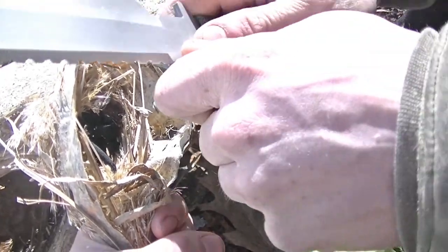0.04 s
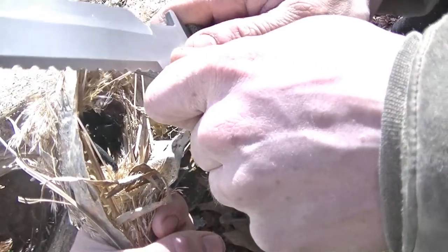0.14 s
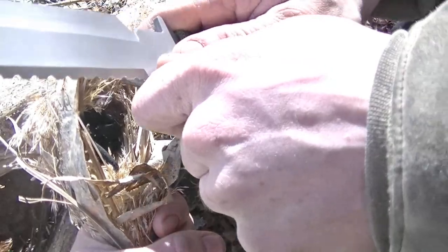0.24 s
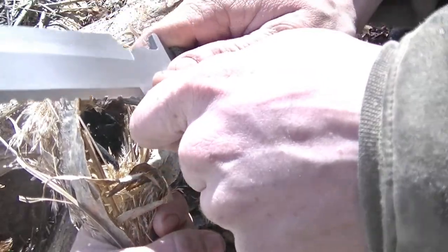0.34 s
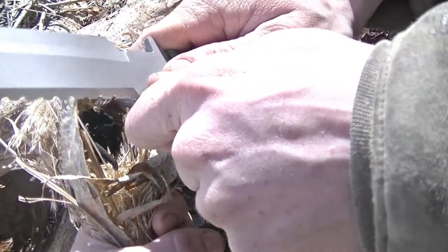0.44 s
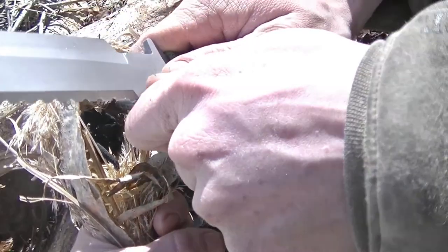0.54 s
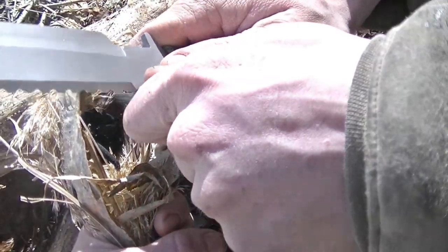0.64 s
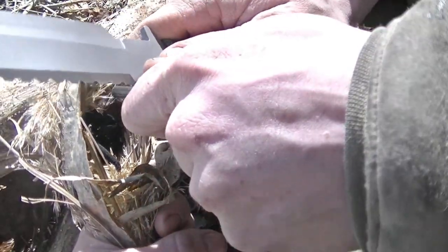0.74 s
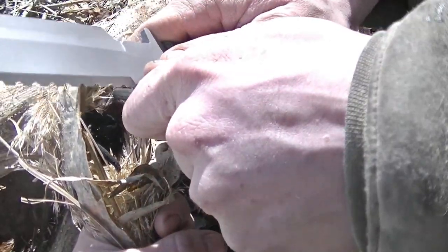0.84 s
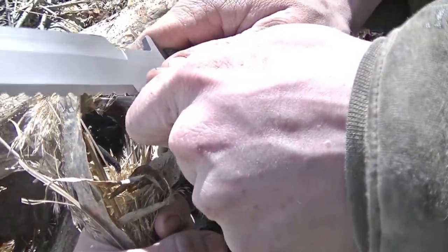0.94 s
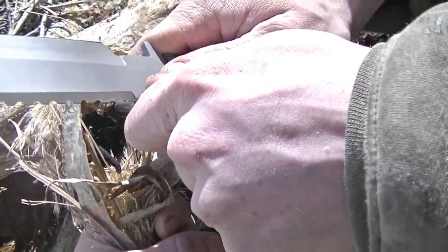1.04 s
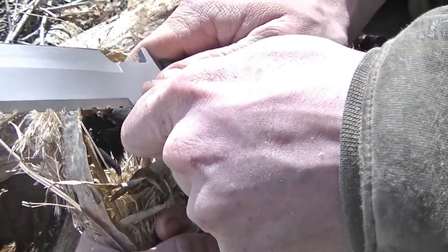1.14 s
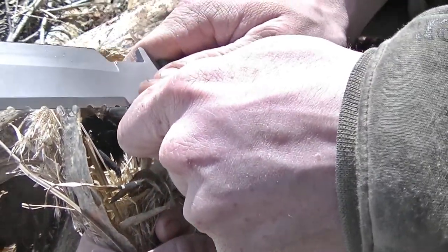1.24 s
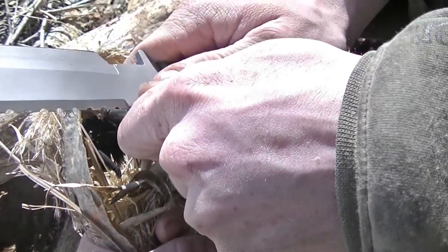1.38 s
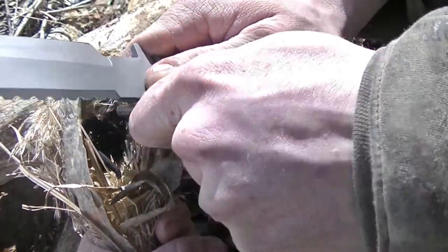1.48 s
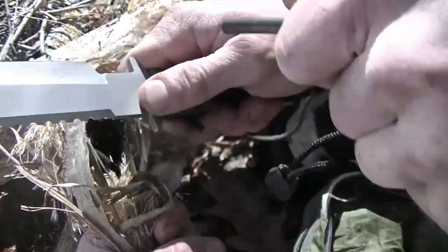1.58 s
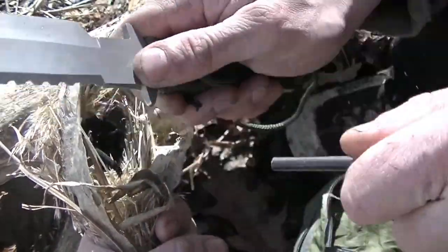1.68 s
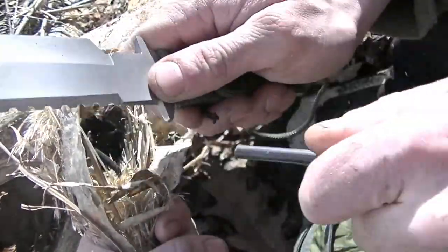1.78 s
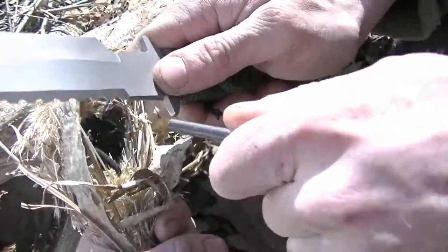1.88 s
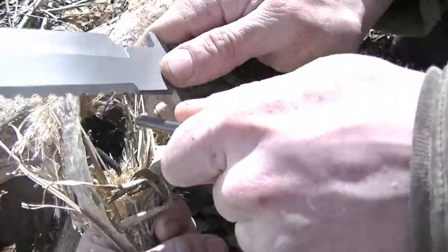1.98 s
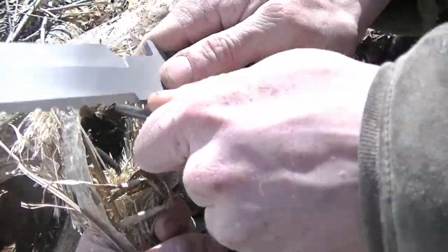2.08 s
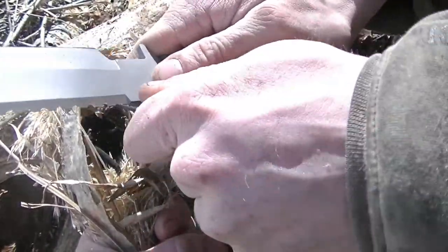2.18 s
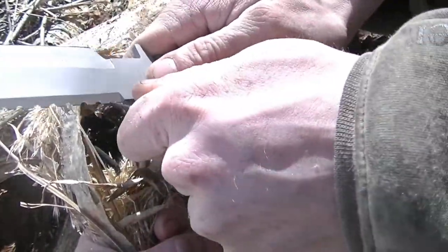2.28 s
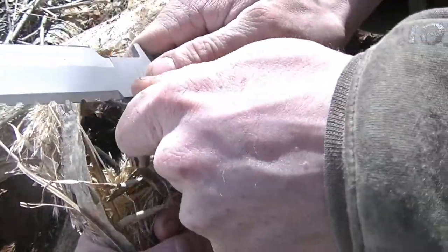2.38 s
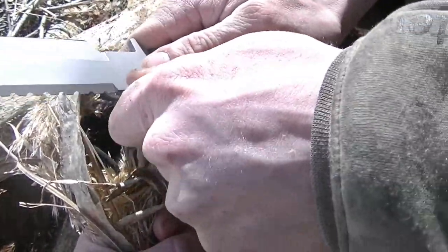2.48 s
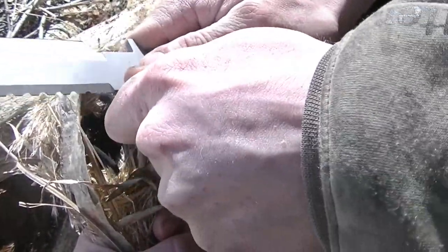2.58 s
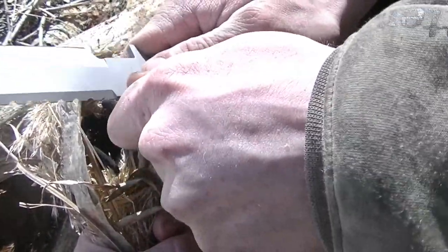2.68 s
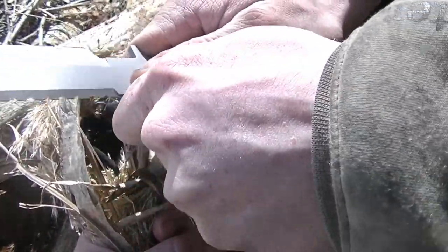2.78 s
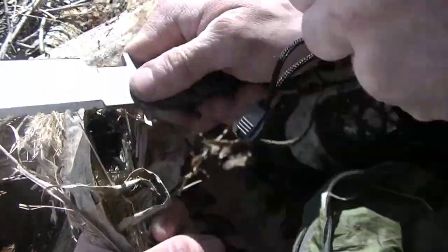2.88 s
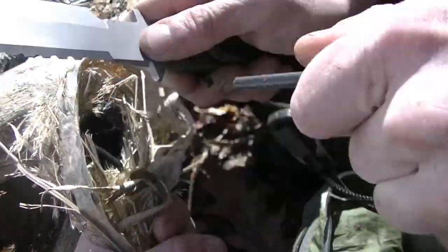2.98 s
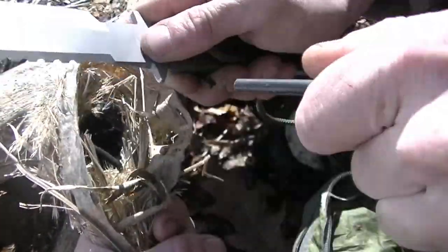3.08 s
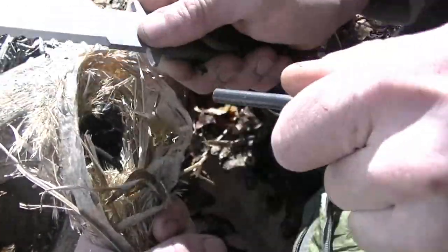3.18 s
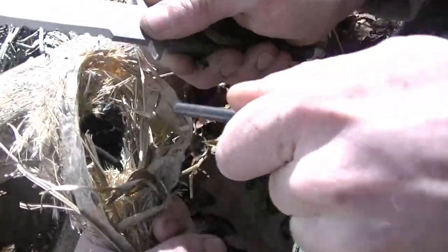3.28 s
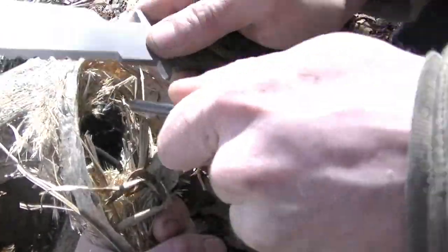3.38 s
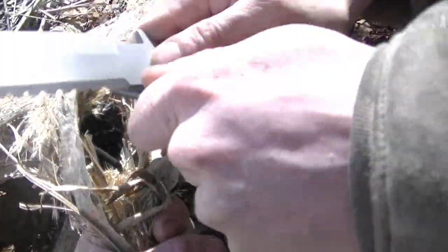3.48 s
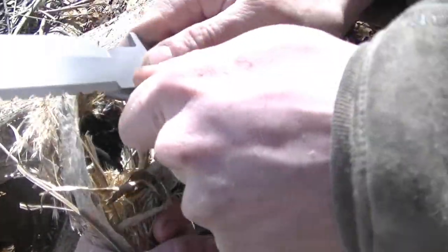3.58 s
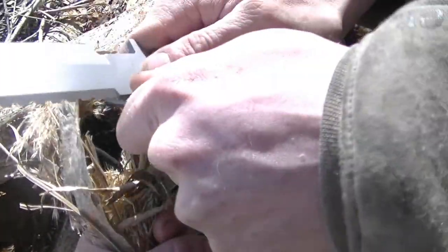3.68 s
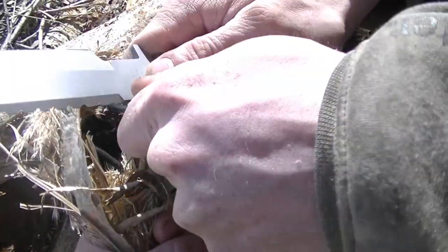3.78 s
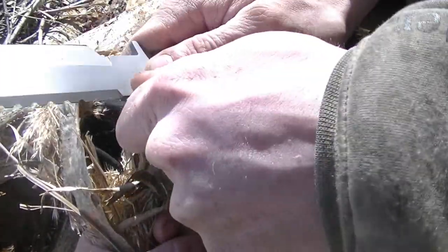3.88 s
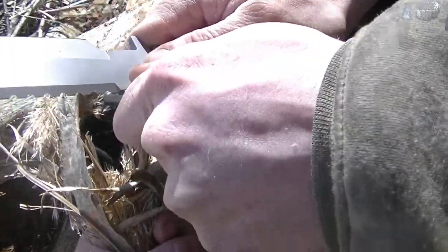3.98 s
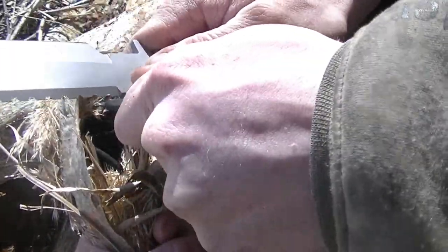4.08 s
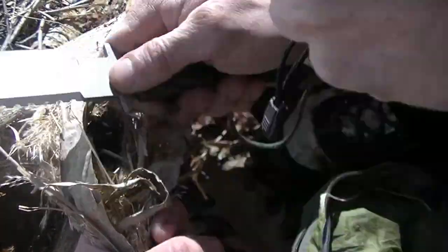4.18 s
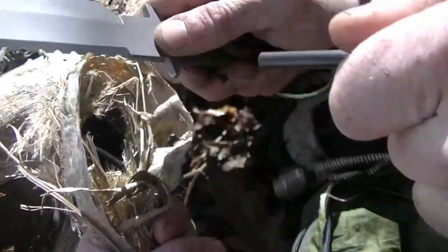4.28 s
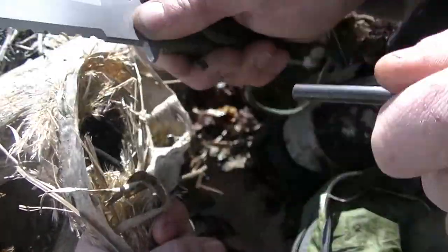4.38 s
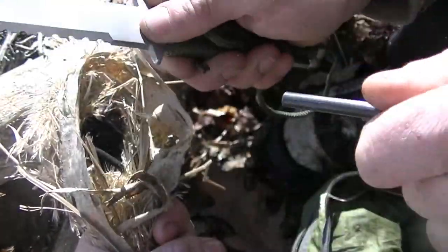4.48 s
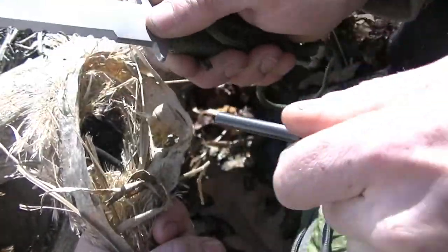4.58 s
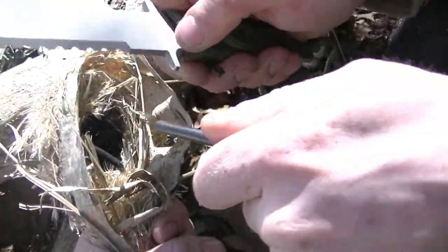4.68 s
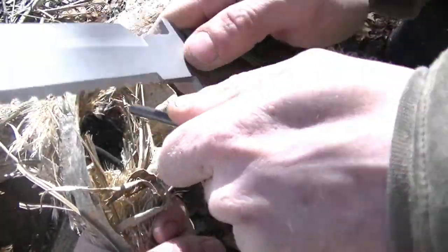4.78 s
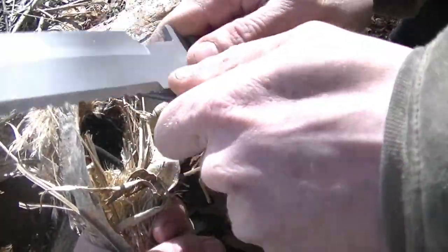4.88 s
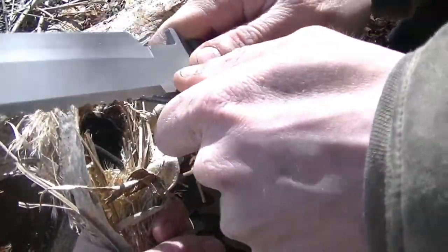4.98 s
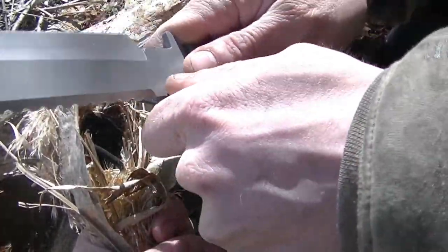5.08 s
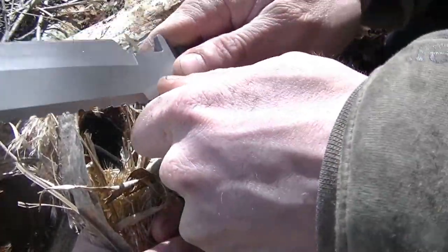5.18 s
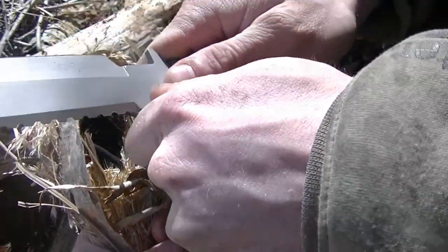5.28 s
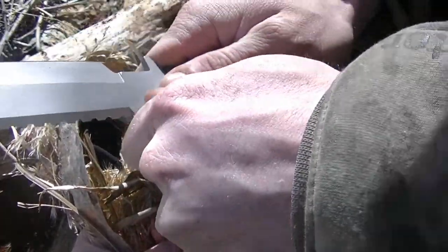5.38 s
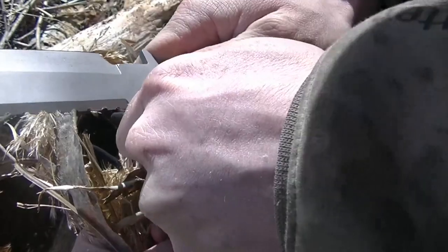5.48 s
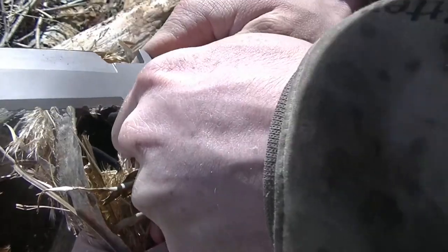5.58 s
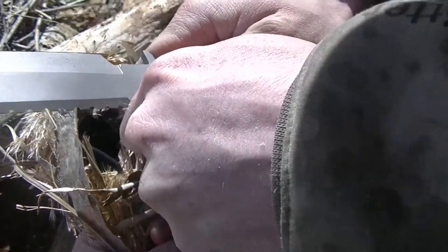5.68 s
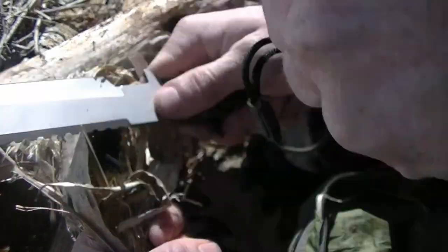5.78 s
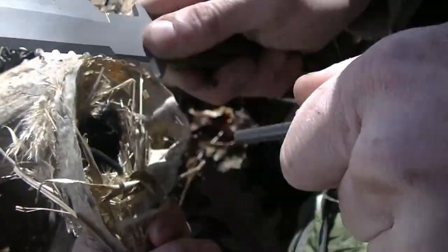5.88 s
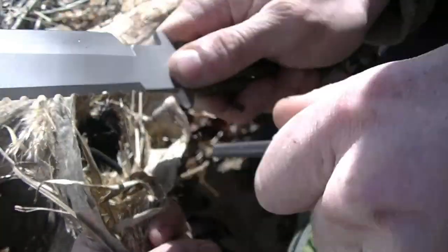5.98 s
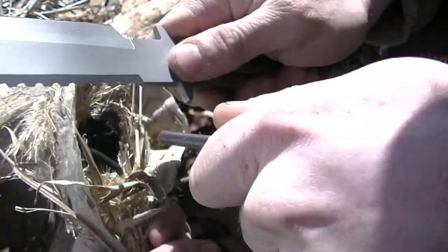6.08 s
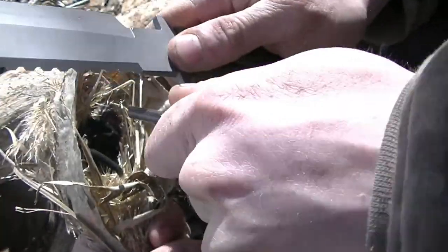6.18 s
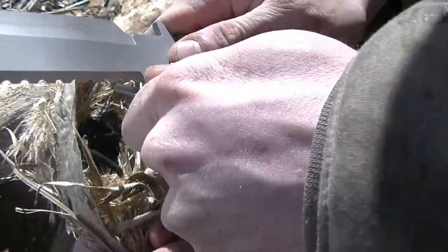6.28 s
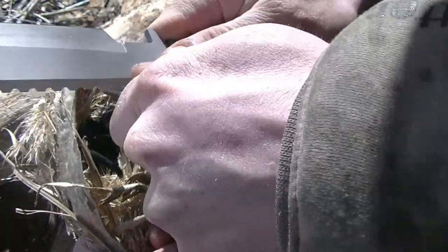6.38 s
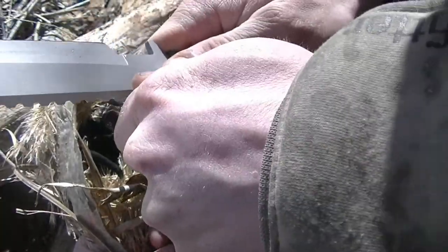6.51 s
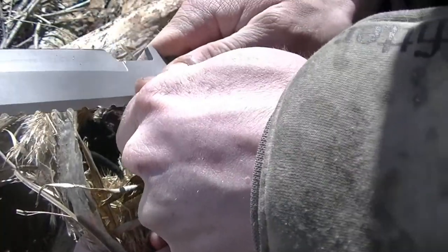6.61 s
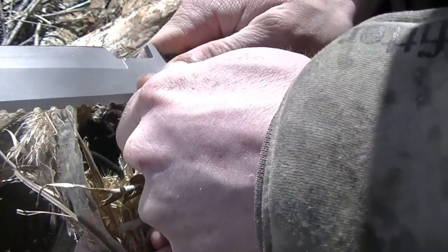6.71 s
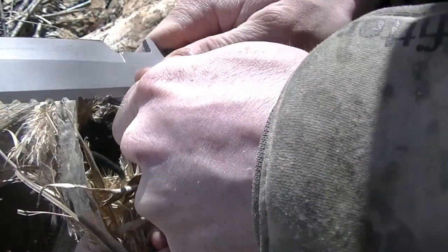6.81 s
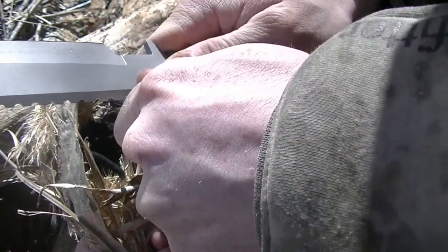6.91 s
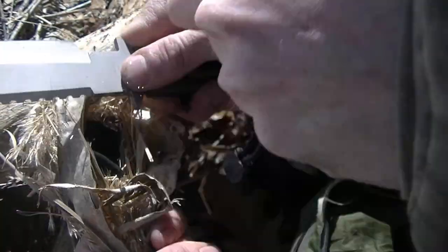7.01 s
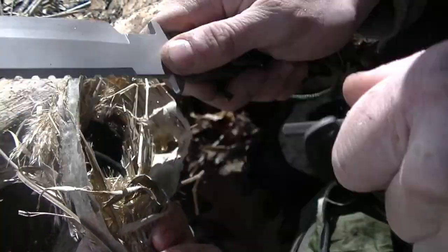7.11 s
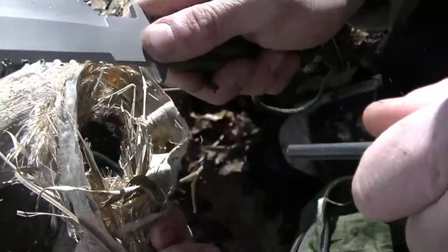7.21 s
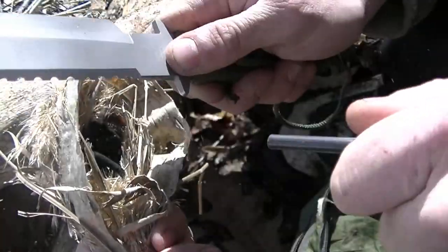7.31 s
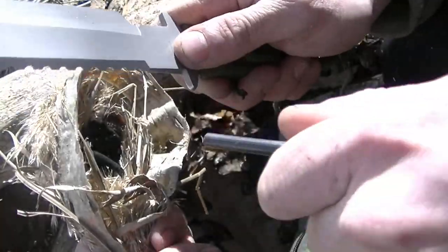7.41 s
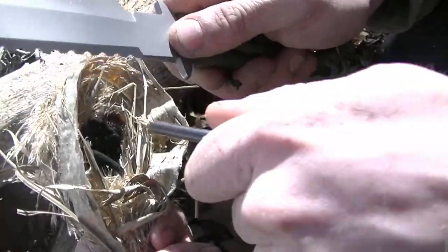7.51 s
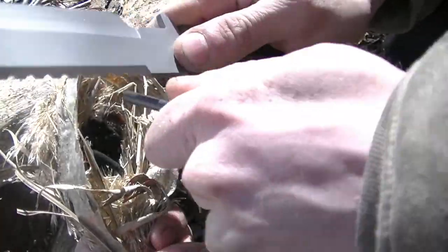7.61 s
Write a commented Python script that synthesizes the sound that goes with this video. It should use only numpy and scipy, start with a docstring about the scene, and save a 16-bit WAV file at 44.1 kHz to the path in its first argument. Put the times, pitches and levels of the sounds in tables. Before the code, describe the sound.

Quiet outdoor air and fine hiss open the scene; at about 0.6 s a small lens motor clicks on and chatters very faintly, about thirty steps a second, until 6.6 s and again from 7.2 s. At 1.5, 2.8, 4.15, 5.7 and 7.0 s a knife spine rips down a fire-starting rod: a gritty, bright metallic rasp of about a twentieth of a second, swelling quickly and stopping in a hard snap with a small dull thud. Sparks fizz out within a tenth of a second. Sharp pops follow at 2.98, 4.27 and 7.13 s, and a burning puff flares at 5.78 s. Steel ticks back on the rod clearly at 2.17 and 4.88 s, softly at 3.5 and 6.3 s, with tiny slides and faint tinder rustles. Close, dry stereo, with no audible echo; the end is quiet hiss.

```python
"""Outdoors, close up: a knife spine is driven down a ferro rod five times over a nest of dry tinder.
Each stroke swells as a grainy rasp through the modes of knife and rod, and snaps off with a knock and thud.
Sparks sizzle as fading coloured noise and pop as resonant bursts; between strokes the steel ticks back on
the rod, slides on it, and the tinder flares and rustles as noise puffs. A small stepping lens motor
chatters faintly over quiet air and hiss."""
import sys
import numpy as np
from scipy import signal
from scipy.fft import rfft, irfft
from scipy.io import wavfile
from scipy.ndimage import uniform_filter1d

SR = 44100
rng = np.random.default_rng(int(sys.argv[2]) if len(sys.argv) > 2 else 0)


def bounce(signal):
    """Save signal as a 16-bit WAV file at the path given by the first command-line argument."""
    frames = np.transpose(np.atleast_2d(signal))
    limited = np.clip(frames, -1, 1)
    pcm = np.round(limited * 32767).astype(np.int16)
    wavfile.write(sys.argv[1], SR, pcm)


N = 337365
TIME = np.arange(N) / SR
SIDES = np.array([[1], [-1]])   # left, right
BLADE_HZ, SQUEAL_HZ = 1606, 11100

# Strokes. Each row: snap time in seconds, length in seconds, rasp in dB, rod squeal against the rasp in dB
# (before SQUEAL_TRIM_DB), snap in dB, snap decay in seconds, sizzle in dB.
STROKE_ROWS = [(1.5168, 0.063, -19, -16, -17, .0008, -38.5), (2.8328, 0.055, -19.5, -30, -14.5, 0.001, -37),
               (4.157, .047, -18.5, -26, -16, 0.0015, -36.5),
               (5.7355, 0.061, -21.5, -32, -15.5, 0.00075, -35),
               (7.0085, .055, -19, -11, -16.5, .0014, -31)]
SWELL_POWER, CHATTER_DB, OVERRUN_S, RELEASE_S, SQUEAL_TRIM_DB = 2.45, 0.97, 0.0015, 0.0024, -12


def strokes():
    """Pressure builds along the rod: thin and bright at first, then the low modes bite, then it lets go."""
    out, t = np.zeros((2, N)), clock(0.3)
    for snap_s, length_s, rasp_db, squeal_db, _, _, sizzle_db in STROKE_ROWS:
        travel = np.clip(t / (length_s + OVERRUN_S), 0, 1)
        after_s = np.maximum(t - length_s - OVERRUN_S, 0)
        swell = np.sin(np.pi / 2 * travel) ** SWELL_POWER
        pressure = swell * np.exp(-after_s / RELEASE_S) * sputter(len(t), depth_db=CHATTER_DB)
        rasp, squeal = scrape(len(t), squeal_db, rough_db=5)
        low = cut(rasp, 7500, "low", order=1)
        thinned = rasp - 0.5 * (1 - travel) * low
        squeal = from_db(SQUEAL_TRIM_DB) * squeal * np.sin(np.pi * travel) ** 2
        # the squeal has its own swell, apart from the pressure
        add(out, snap_s - length_s, from_db(rasp_db) * (pressure * thinned + squeal))
        add(out, snap_s + OVERRUN_S, from_db(sizzle_db) * spark_shower(t))
    return out


# Sizzle spectrum. Each row: frequency in Hz, relative density in dB per Hz.
SIZZLE_SPECTRUM = [(200, -29.5), (1000, -16), (2000, -10.5), (3200, 0), (5200, -5.5), (6500, -2),
                   (7700, -5.5), (9400, -7), (11000, -17.5), (12500, -9), (14200, -14), (16000, -41)]
FADE_DB_PER_S, LIFE_S, ATTACK_S = 113, 0.13, 0.00075
CRACKLES_PER_S, CRACKLE_DB = 79, -12.5


def spark_shower(t):
    """Burning sparks hiss and crackle; the shower thins out, then the last ones go dark."""
    thinning = from_db(-FADE_DB_PER_S * t) / (1 + (t / LIFE_S) ** 8)
    embers = thinning * (1 - np.exp(-t / ATTACK_S)) * sputter(len(t), depth_db=1.5)
    sparks = grains(len(t), rough_db=3.5, spread=0.043) + from_db(CRACKLE_DB) * crackles(len(t))
    return embers * rms_one(colour(sparks, SIZZLE_SPECTRUM))


def crackles(size):
    """Lone sparks burst at random moments with uneven strength; unit power on average."""
    chance = CRACKLES_PER_S / SR
    return (rng.random(size) < chance) * rng.standard_normal(size) / np.sqrt(chance)


def sputter(size, depth_db):
    """A level that flares and fades every few milliseconds."""
    flicker = cut(rng.standard_normal(size), 103, "low")
    return rms_one(from_db(depth_db * rms_one(flicker)))


def scrape(size, squeal_db, rough_db):
    """The edge shaves the rod at unit level; friction makes the rod's top mode squeal."""
    force = grains(size, rough_db, spread=0.08)
    squeal = resonate(resonate(force, SQUEAL_HZ, 400), SQUEAL_HZ, 400)
    rasp = cut(steel(force, grit_db=-19.5), 970, "high")
    return rms_one(rasp), from_db(squeal_db) * rms_one(squeal)


# Knife and rod, damped by the hands. Each row: mode in Hz, width in Hz, gain in dB.
STEEL_MODES = [(1515, 55, -31), (2240, 180, -13), (2545, 134, 2.5), (2830, 88, 2), (2880, 30, 7),
               (3080, 210, 2.5), (3422, 176, 4), (3595, 97, 5), (4540, 210, 1.5), (5026, 120, 0.5),
               (5750, 100, -5.5), (6006, 87, 2.5), (6160, 210, -4), (6400, 160, -2), (7250, 740, -6),
               (8100, 300, -1.5), (8580, 400, 0), (9110, 160, -1), (9750, 540, -11), (11190, 200, -14.5)]
# Grit at the contact. Each row: frequency in Hz, relative density in dB per Hz.
GRIT_SPECTRUM = [(100, -61), (400, -21.5), (900, -10.5), (1500, 3), (2300, 2), (8000, -5), (11500, -4),
                 (13000, 3), (16000, -11)]


def steel(force, grit_db):
    """Knife and rod ring, and the contact itself radiates broadband grit."""
    return from_db(grit_db) * colour(force, GRIT_SPECTRUM) - body(force, STEEL_MODES)


# Thud in the hands. Each row: frequency in Hz, relative density in dB per Hz.
THUD_SPECTRUM = [(30, -10), (130, 1.5), (350, 0.5), (550, -1), (800, 7.5), (1400, -7.5), (2500, 4),
                 (6000, -43)]
THUD_RE_SNAP_DB = -24


def snaps():
    """A bright knock as the edge leaves the rod, and the hands take up a dull thud."""
    out = np.zeros((2, N))
    for snap_s, _, _, _, db, decay_s, _ in STROKE_ROWS:
        ring = knock(db, decay_s, hz=6200, boost_db=6, top_hz=16000, hum_db=-28.5, ping_db=-28)
        thud = colour(burst(0.0015, crack=1.3), THUD_SPECTRUM)
        add(out, snap_s, ring + at_level(thud, db + THUD_RE_SNAP_DB))
    return out


# Steel set back on the rod. Each row: time in seconds, level in dB, decay in seconds, strongest frequency
# in Hz, its boost in dB, rod ping against the level in dB.
SET_DOWN_ROWS = [(2.1676, -15, 0.00049, 7700, 19, -18), (3.499, -30.5, 0.00048, 2970, 11, -16),
                 (4.8845, -16.5, 0.0023, 7400, 9.5, -6), (6.3191, -27.5, 0.00041, 3230, 1, -41)]
FIRM_DB = -16   # reference for softer hits
FIRM_TOP_HZ, SOFTER_DB_PER_OCTAVE = 12800, 12.5
FIRM_HUM_DB, HUM_DB_PER_SOFTER_DB = -20, 0.5


def set_downs():
    """Steel lands on the rod without a thud: a hard landing is bright, a soft one duller with more hum."""
    out = np.zeros((2, N))
    for s, db, decay_s, hz, boost_db, ping_db in SET_DOWN_ROWS:
        softer_db = FIRM_DB - db
        top_hz = FIRM_TOP_HZ * np.exp2(-softer_db / SOFTER_DB_PER_OCTAVE)
        hum_db = FIRM_HUM_DB + HUM_DB_PER_SOFTER_DB * softer_db
        add(out, s, knock(db, decay_s, hz, boost_db, top_hz, hum_db, ping_db))
    return out


def knock(db, decay_s, hz, boost_db, top_hz, hum_db, ping_db):
    """The point of contact picks which modes ring most; blade and rod sing briefly."""
    t = clock(0.06)
    grip = np.exp(-t / 0.0042)   # the firm grip chokes the ring
    ring = steel(burst(decay_s, crack=0.53), grit_db=-16.5) * grip
    ring = cut(ring + (from_db(boost_db) - 1) * resonate(ring, hz, 1200), top_hz, "low")
    hum = from_db(db + hum_db) * np.sin(2 * np.pi * BLADE_HZ * t) * np.exp(-t / 0.0045)
    ping = from_db(db + ping_db) * np.sin(2 * np.pi * SQUEAL_HZ * t) * np.exp(-t / 0.0029)
    return at_level(ring, db) + hum + ping


# Pops of sparks, ticks of tinder, and at 0.658 s the lens motor's second step. Each row: time in seconds,
# level in dB (before panning), centre in Hz, nominal width in Hz (the filters are wider),
# pan as left minus right in dB.
CLICK_ROWS = [(.658, -44, 4650, 800, 4), (1.533, -38, 7000, 6000, -3), (1.634, -43, 5000, 5000, 1),
              (2.42, -53.5, 7400, 4000, 3), (2.609, -47, 8450, 900, 3), (2.9800, -20, 6400, 4050, -2.5),
              (3.130, -54.5, 6200, 1500, 8), (3.557, -51, 3000, 7000, 2), (4.2706, -18, 6340, 12100, -1.5),
              (4.734, -52, 3800, 2500, 0), (5.9054, -36, 3120, 1270, -2), (7.0784, -29.5, 3540, 5000, -1),
              (7.1328, -15.5, 4850, 1410, 2.5)]
CLICK_DECAY_S, CLICK_DOUBLING_DB, CLICK_TOP_HZ = 0.0013, 17, 16000   # decay at FIRM_DB, drop that doubles it


def pops_and_ticks():
    """Spark pops, tinder ticks and one motor step: resonant bursts, the loud ones over sooner."""
    out = np.zeros((2, N))
    for s, db, hz, width_hz, pan_db in CLICK_ROWS:
        decay_s = CLICK_DECAY_S * np.exp2((FIRM_DB - db) / CLICK_DOUBLING_DB)
        crack = burst(decay_s, crack=1.02)
        click = resonate(crack, hz, 1.5 * width_hz) + from_db(-9) * crack
        click = resonate(click, hz, 1.63 * width_hz)
        # bare crack fills in the lows and the very top
        fill = from_db(-25) * min(1, width_hz / 6000) * crack
        click = cut(cut(click, 1500, "high") + fill, CLICK_TOP_HZ, "low", order=4)
        add(out, s, at_level(click, db) * from_db(pan_db * SIDES / 2))
    return out


# Edge on the rod. Each row: centre in seconds, Gaussian sigma in seconds, peak level in dB,
# rod squeal against the rasp in dB (before SLIDE_SQUEAL_TRIM_DB).
SLIDE_ROWS = [(3.515, 0.027, -51, -14), (3.762, 0.012, -52, -36), (4.655, 0.017, -47, -3),
              (4.859, 0.011, -53.5, 9), (4.914, 0.014, -46, -5), (6.427, 0.0094, -43.5, 6)]
SLIDE_SQUEAL_TRIM_DB = -17


def slides():
    """The edge feels for its place on the rod with hardly any pressure."""
    out = np.zeros((2, N))
    for s, sigma_s, db, squeal_db in SLIDE_ROWS:
        t = clock(6 * sigma_s)
        rasp, squeal = scrape(len(t), squeal_db, rough_db=5)
        sound = rasp + from_db(SLIDE_SQUEAL_TRIM_DB) * squeal
        add(out, s - t[-1] / 2, from_db(db) * sound * bell(t, sigma_s))
    return out


# Burning shavings. Each row: centre in seconds, Gaussian sigma in seconds, peak level in dB,
# resonance in Hz, its width in Hz.
FLARE_ROWS = [(1.566, 0.0064, -47, 2240, 25), (1.566, 0.0071, -58, 1100, 25),
              (4.212, 0.005, -37, 3970, 4000), (5.767, 0.0046, -27.5, 5920, 7000),
              (5.7825, 0.0068, -22.5, 5330, 4000), (5.783, 0.0044, -25.5, 2820, 300),
              (5.830, 0.0063, -43.5, 5000, 4000)]


def flares():
    """Burning shavings flare up as broad noise or whistle as a narrow resonance."""
    return puffs(FLARE_ROWS, rough_db=-2)


# Hands and sleeve. Each row: centre in seconds, Gaussian sigma in seconds, peak level in dB.
RUSTLE_ROWS = [(3.148, 0.021, -60), (4.775, 0.028, -55.5), (5.349, 0.091, -58.5), (6.588, 0.016, -62)]
RUSTLE_HZ, RUSTLE_WIDTH_HZ = 5460, 3700


def rustles():
    """Hands and sleeve brush the tinder: many small uneven fractures in one broad band."""
    return puffs([(*row, RUSTLE_HZ, RUSTLE_WIDTH_HZ) for row in RUSTLE_ROWS], rough_db=7.5)


def puffs(rows, rough_db):
    """Short puffs of resonant grainy noise that rise and fall."""
    out = np.zeros((2, N))
    for s, sigma_s, db, hz, width_hz in rows:
        t = clock(6 * sigma_s)
        noise = resonate(grains(len(t), rough_db, spread=0.21), hz, width_hz)
        noise = cut(noise, min(2600, hz * 1.2), "high")
        noise = rms_one(cut(noise, 9600, "low", order=4))
        add(out, s - t[-1] / 2, from_db(db) * noise * bell(t, sigma_s))
    return out


# Lens motor. Each row: start in seconds, end in seconds, level in dB, share of steps that sing.
MOTOR_RUN_ROWS = [(.629, 6.6, -61, 0.36), (7.2, 7.65, -61.5, .45)]
# Motor housing. Each row: mode in Hz, width in Hz, gain in dB.
HOUSING_MODES = [(1338, 138, -1.5), (1874, 98, 0.5), (2390, 580, -6.5), (2917, 190, 0.5), (3425, 410, -3.5)]
MOTOR_STEPS_PER_S = 29.97
KICK_DECAY_S, RUN_DECAY_S, FIRST_KICK_DB = 0.0023, 0.021, 22
PIP_HZ, PIP_DELAY_S, PIP_HALF_S, PIP_DB = 2900, 0.015, 0.0072, 5   # mean pitch; level against the motor's


def lens_motor():
    """About thirty steps a second shake the housing: a kick, then a short run that at times sings as a pip."""
    gain, share = np.zeros((2, N))
    for start_s, end_s, db, singing in MOTOR_RUN_ROWS:
        running = (TIME >= start_s) & (TIME < end_s)
        gain[running], share[running] = from_db(db), singing
    steps = np.maximum(TIME - MOTOR_RUN_ROWS[0][0], 0) * MOTOR_STEPS_PER_S
    step, since_s = steps.astype(int), steps % 1 / MOTOR_STEPS_PER_S
    # each step draws its own strengths; N // 1000 exceeds the number of steps
    kick, run = rng.standard_normal((N // 1000, 2))[step].T
    sings = rng.random(N // 1000)[step] < share
    kick_db = np.where(step == 0, FIRST_KICK_DB, kick)
    drive = from_db(kick_db) * np.exp(-since_s / KICK_DECAY_S)
    drive = drive + 0.76 * from_db(2 * run) * np.exp(-since_s / RUN_DECAY_S)
    force = (gain > 0) * drive * grains(N, rough_db=-0.7, spread=0.17)
    rattle = rms_one(body(force, HOUSING_MODES))
    pip_shape = np.exp(-((since_s - PIP_DELAY_S) / PIP_HALF_S) ** 2)
    pip = sings * from_db(0.55 * kick) * pip_shape * np.sin(2 * np.pi * (PIP_HZ + 25 * run) * since_s)
    return gain * (rattle + from_db(PIP_DB) * pip)


# Air. Each row: frequency in Hz, relative density in dB per Hz.
AIR_SPECTRUM = [(20, -15), (50, -12.5), (100, -8), (170, -1.5), (260, 0), (400, -3), (600, -11.5),
                (1000, -14), (2000, -17.5), (5000, -45)]
# Hiss. Each row: frequency in Hz, relative density in dB per Hz.
HISS_SPECTRUM = [(300, -13.5), (1200, -11), (2000, -1.5), (3000, 0.5), (4700, 2), (6200, -2), (7500, -5),
                 (10000, -8), (13000, -11.5), (16000, -17)]
# Hiss level. Each row: time in seconds, level in dB.
HISS_LEVEL_ROWS = [(0, -56), (.6, -58), (6.5, -57.5), (6.8, -58.5), (7.65, -58)]


def background():
    """Low outdoor air, a fine hiss, and one soft 45 Hz bump as the arm swings past."""
    air = from_db(-62) * rms_one(colour(grains(N, rough_db=0, spread=0.32), AIR_SPECTRUM))
    hiss_db = np.interp(TIME, *np.transpose(HISS_LEVEL_ROWS))
    hiss = from_db(hiss_db) * rms_one(colour(grains(N, rough_db=2, spread=0.72), HISS_SPECTRUM))
    bump = from_db(-58) * np.sin(2 * np.pi * 45 * TIME) * np.exp(-((TIME - 5.565) / 0.039) ** 2)
    return air + hiss + bump


def grains(size, rough_db, spread):
    """Dense tiny fractures of uneven strength; spread sets how much the two ports differ."""
    mid, side = rng.standard_normal((2, size))
    unevenness = rms_one(uniform_filter1d(rng.standard_normal(size), size=24))
    return rms_one(from_db(rough_db * unevenness) * (mid + spread * side * SIDES))


def burst(decay_s, crack):
    """A one-sample crack and a cloud of fractures that dies away exponentially."""
    t = clock(0.06)
    cloud = rms_one(grains(len(t), rough_db=0, spread=0.2) * np.exp(-t / decay_s))
    return cloud + crack * rms_one(1.0 * (t == 0))


def at_level(hit, db):
    """Set the level of a hit: its energy over both sides, averaged over 5 ms."""
    return from_db(db) * hit / np.sqrt(np.sum(hit ** 2) / 2 / (0.005 * SR))


def bell(t, sigma_s):
    """Gaussian rise and fall about the middle of t."""
    return np.exp(-((t - t[-1] / 2) / sigma_s) ** 2 / 2)


def from_db(db):
    """Decibels to gain."""
    return 10 ** (np.asarray(db) / 20)


def rms_one(x):
    """Scale to unit power."""
    return x / np.sqrt(np.mean(x ** 2) + 1e-20)


def clock(seconds):
    """Sample times of a short event."""
    return np.arange(int(seconds * SR)) / SR


def add(out, s, sound):
    """Mix a sound in at time s."""
    at = int(s * SR)
    out[:, at:at + sound.shape[1]] += sound[:, :N - at]


def colour(x, spectrum, size=4096):
    """Causal (minimum-phase) filter with the given (Hz, dB) outline."""
    hz, db = np.transpose(spectrum)
    log_hz = np.log(np.arange(size // 2 + 1) * SR / size + 1)
    outline_db = np.interp(log_hz, np.log(hz), db)
    # fold the cepstrum onto positive time
    cepstrum = irfft(np.log(from_db(outline_db))) * (1 + np.sign(size // 2 - np.arange(size)))
    cepstrum[0] /= 2
    impulse = irfft(np.exp(rfft(cepstrum)))
    return signal.oaconvolve(x, impulse[None])[:, :x.shape[1]]


def resonate(x, hz, width_hz):
    """One two-pole resonance with gain 1 on top."""
    r = np.exp(-np.pi * width_hz / SR)
    zeros = np.array([1, 0, -1]) * (1 - r * r) / 2
    poles = [1, -(1 + r * r) * np.cos(2 * np.pi * hz / SR), r * r]
    return signal.lfilter(zeros, poles, x + 1e-18)


def body(x, modes):
    """Parallel resonances of alternating sign."""
    return sum((-1) ** k * from_db(db) * resonate(x, hz, width_hz) for k, (hz, width_hz, db) in enumerate(modes))


def cut(x, hz, kind, order=2):
    """Butterworth low- or high-pass."""
    return signal.sosfilt(signal.butter(order, min(hz, SR / 2 - 100), kind, fs=SR, output="sos"), x)


# What the two microphone ports favour. Each row: frequency in Hz, left minus right in dB.
PORT_TILT = [(1500, 1.5), (2700, 0.5), (3500, -4), (4300, -3), (5200, -2.5), (6400, 9.5), (8000, -1.5),
             (9800, -8.5), (15000, 1.5)]


def scene():
    """Hand work just in front of the two ports; its shortest waves reach them out of step."""
    work = strokes() + snaps() + set_downs() + pops_and_ticks() + slides() + flares() + rustles()
    left = colour(work[:1], [(hz, db / 2) for hz, db in PORT_TILT])
    right = colour(work[1:], [(hz, -db / 2) for hz, db in PORT_TILT])
    right = right - 2 * resonate(right, 13750, 1360)   # flips the polarity around 13.75 kHz
    return np.vstack([left, right]) + lens_motor() + background()


CUTOFF_HZ = 16000


def record(dry):
    """Peaks are clipped at 0.85 of full scale, then the top is cut steeply."""
    steep = signal.ellip(10, 0.1, 80, CUTOFF_HZ, fs=SR, output="sos")
    return signal.sosfilt(steep, np.clip(dry, -0.85, 0.85))


dry = scene()
out = record(dry)
bounce(out)
```